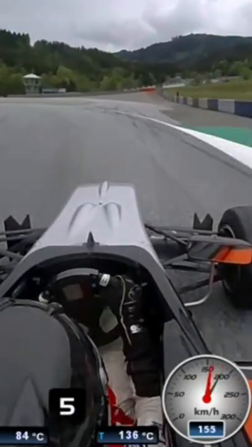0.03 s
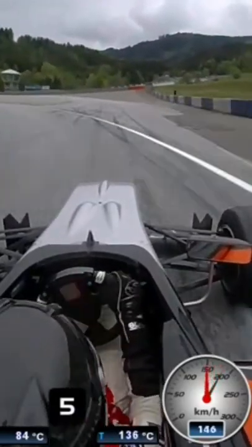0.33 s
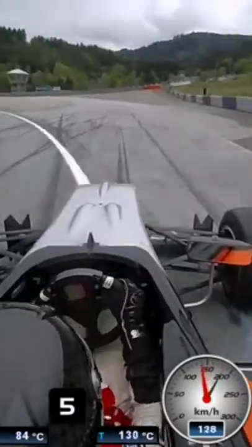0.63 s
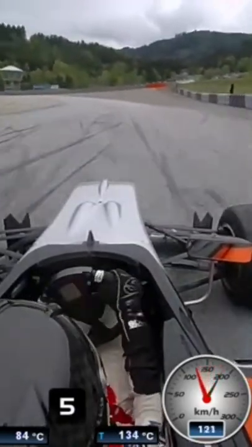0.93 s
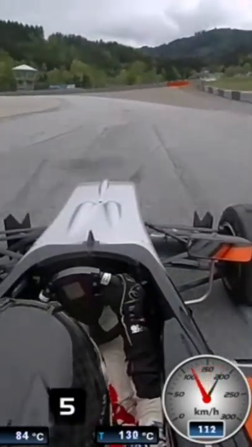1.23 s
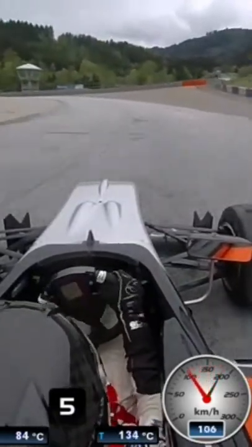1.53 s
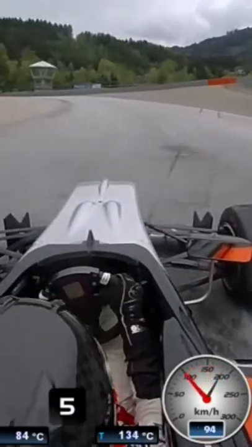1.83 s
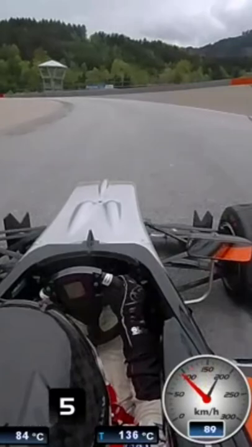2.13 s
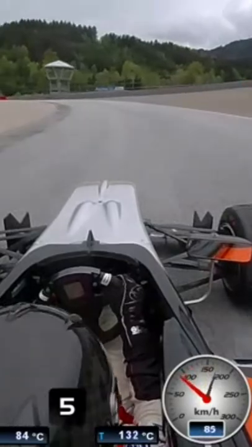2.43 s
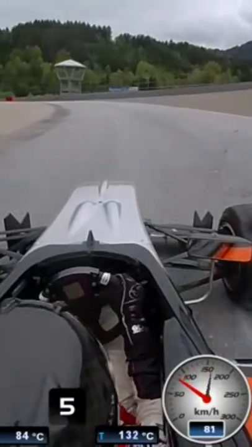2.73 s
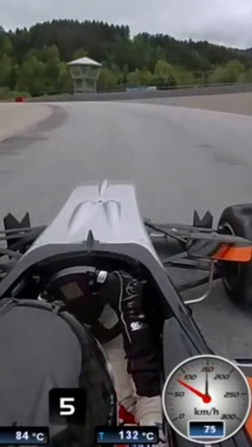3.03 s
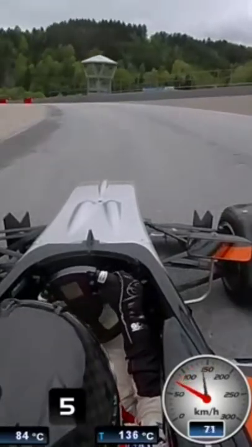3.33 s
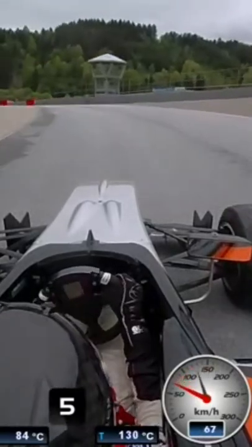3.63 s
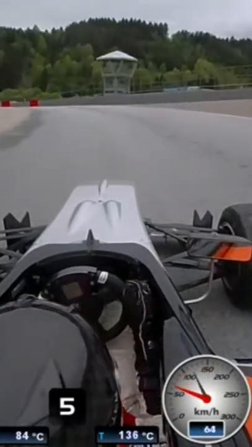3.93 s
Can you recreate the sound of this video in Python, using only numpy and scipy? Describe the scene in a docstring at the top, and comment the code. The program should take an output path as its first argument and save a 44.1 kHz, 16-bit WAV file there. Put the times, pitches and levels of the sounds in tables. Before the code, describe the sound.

Heard from behind the driver, a slowing race car engine blips once and drops to a low, popping burble over wind and tyre noise. Faint friction squeals come and go, loud knocks briefly ring the chassis, and light tapping follows.

```python
"""Open-wheel race car slowing, on board

The engine flares once with a bark, then burbles and pops on a trailing throttle. Its valve gear
rattles and, late on, a loose part taps. Wind and tyres rush, a short volley of knocks rings the
chassis, bumps boom in the bodywork, grit ticks on it and brakes or tyres squeal faintly.
The loudest moments overload the microphone."""
import sys
import numpy as np
from scipy import signal
from scipy.fft import rfft, irfft, next_fast_len
from scipy.io import wavfile
from scipy.ndimage import uniform_filter1d, map_coordinates

SR = 44100
rng = np.random.default_rng(int(sys.argv[2]) if len(sys.argv) > 2 else 0)


def transcribe(u):
    """Save the signal u as a 16-bit wav file named by the first command-line argument.

    u: samples, shape (n,) or (channels, n), limited to [-1, 1]; the rate is SR.
    q: integer samples, one column per channel.
    """
    v = np.clip(np.atleast_2d(u).T, -1, 1)
    q = np.round(v * 32767).astype(np.int16)
    wavfile.write(sys.argv[1], SR, q)


N = 176400
TIME_S = np.arange(N) / SR


def amp(db):
    """Decibels to gain."""
    return 10 ** (np.asarray(db) / 20)


def unit(x):
    """Scale to rms 1."""
    return x / np.sqrt(np.mean(x ** 2) + 1e-20)


def curves(rows):
    """Each column after the time, interpolated per sample."""
    times_s, *columns = np.transpose(rows)
    return [np.interp(TIME_S, times_s, column) for column in columns]


def wobble(rate_hz):
    """Smooth random curve through Gaussian knots."""
    knots = rng.standard_normal(int(N * rate_hz / SR) + 4)
    return map_coordinates(knots, [TIME_S * rate_hz])


def filtered(x, response):
    """Apply a complex frequency response."""
    size = next_fast_len(N + SR // 2)
    return irfft(rfft(x, size) * response(np.fft.rfftfreq(size, 1 / SR)), size)[:N]


def coloured(x, spectrum):
    """Shape x by (f/Hz, level/dB) points, then scale to rms 1."""
    points_hz, db = np.transpose(spectrum)
    return unit(filtered(x, lambda hz: amp(np.interp(np.log(hz + 1), np.log(points_hz), db))))


def turbulence(patch_db=2.5):
    """White noise with patches of random gain in time and frequency."""
    bins = signal.stft(rng.standard_normal(N), nperseg=1024)[2]
    patches = uniform_filter1d(rng.standard_normal(bins.shape), size=6, axis=0)
    patches = uniform_filter1d(patches, size=6, axis=1)
    return signal.istft(bins * amp(patch_db * unit(patches)), nperseg=1024)[1][:N]


def strikes(rows, attack_s):
    """Envelope of fast-rising, decaying blows, summed in power."""
    power = np.zeros(N)
    for start_s, db, t60_s in rows:
        age_s = np.maximum(TIME_S - start_s, 0)
        power += (amp(db - 60 * age_s / t60_s) * (1 - np.exp(-age_s / attack_s))) ** 2
    return np.sqrt(power)


def ring(hits, hz, t60_s):
    """Damped resonance struck by each hit."""
    age_s = TIME_S[:SR // 10]
    swing = amp(-60 * age_s / t60_s) * np.sin(2 * np.pi * hz * age_s)
    low_cut = signal.butter(2, hz / 2, "highpass", fs=SR, output="sos")
    return signal.sosfilt(low_cut, signal.fftconvolve(hits, swing)[:N])


def impulses(cycles):
    """One impulse per completed cycle."""
    return np.diff(np.floor(cycles), append=0) > 0


# t/s, firing f/Hz, fundamental level/dB, second harmonic level/dB
ENGINE_TRACK = [(0, 106.6, -5, -27), (0.05, 103.1, -5.5, -43), (0.09, 79.65, -12.5, -24.5),
                (0.26, 64.4, -16, -34), (0.29, 104.2, -6, -22), (0.365, 92.05, -9, -28),
                (0.405, 130.2, -2, -12), (0.5, 157.3, -4.5, -35), (0.67, 133.2, -5, -16),
                (0.73, 108.1, -7.5, -30), (0.8, 98.2, -8, -25.5), (0.92, 65.03, -20, -23),
                (1.17, 66.33, -15.5, -20), (1.27, 66.55, -17.5, -31), (1.35, 58.24, -21.5, -14),
                (1.76, 60.07, -19.5, -14), (1.86, 55, -21.5, -18), (2.3, 51.53, -21.5, -25),
                (2.55, 62.34, -17.5, -12.5), (2.66, 59.62, -18, -22.5), (2.87, 79.7, -10.5, -31),
                (2.98, 67.93, -15.5, -20.5), (3.1, 58.47, -22, -13), (3.17, 87.02, -7.5, -26.5),
                (3.25, 82.5, -9.5, -30), (3.34, 73.9, -16, -29.5), (3.42, 82.4, -9.5, -38),
                (3.55, 70.4, -14, -27), (3.67, 82.98, -10, -26), (3.76, 77.4, -14, -25.5),
                (4, 72.0, -15, -35)]


def engine(jitter=0.012, rasp_above_hz=120):
    """Exhaust, rattle and a loose part, all driven by one slightly unsteady firing rate."""
    firing_hz, first_db, second_db = curves(ENGINE_TRACK)
    phase = 2 * np.pi * np.cumsum(firing_hz * (1 + jitter * wobble(40))) / SR
    revved = np.clip((firing_hz - rasp_above_hz) / 10, 0, 1)
    exhaust = exhaust_boom(phase, first_db, second_db) + exhaust_pulses(phase, revved)
    return exhaust + engine_rattle(phase, revved) + loose_part(phase)


# harmonic number, level/dB re a blend of the lowest two
UPPER_HARMONICS = [(3, -21), (4, -27.5), (5, -29)]


def exhaust_boom(phase, first_db, second_db, shimmer_db=1.5, upper_swing_db=3):
    """Two strong harmonics of the firing rate and weak upper ones, all a little uneven."""
    first, second = amp(first_db), amp(second_db)
    boom = first * amp(shimmer_db * wobble(35)) * np.sin(phase)
    boom += second * amp(shimmer_db * wobble(35)) * np.sin(2 * phase)
    blend = np.hypot(first, 2 * second)
    for harmonic, db in UPPER_HARMONICS:
        gain = blend * amp(db + upper_swing_db * wobble(25))
        boom += gain * np.sin(harmonic * phase + 0.5 * wobble(30))
    return np.sqrt(2) * boom


# exhaust resonances: f/Hz, level/dB, t60/s
OVERRUN_MODES = [(203, -24.5, 0.069)]
HIGH_REV_MODES = [(460, -31, 0.0078), (700, -25, 0.0076), (2170, -15.5, .009)]


def exhaust_pulses(phase, revved, scatter_db=4, stagger_cycles=0.12):
    """Uneven firings ring the exhaust: a staggering burble on the overrun, a bark at high revs."""
    cycles = phase / (2 * np.pi)
    strength = amp(scatter_db * np.clip(rng.standard_normal(N), -2, 2))
    staggered = strength * impulses(cycles + stagger_cycles * wobble(60))
    on_time = strength * impulses(cycles)
    burble = sum(amp(db) * ring(staggered, hz, t60_s) for hz, db, t60_s in OVERRUN_MODES)
    bark = sum(amp(db) * ring(on_time, hz, t60_s) for hz, db, t60_s in HIGH_REV_MODES)
    return (1 - revved) * burble + revved * bark


# t/s, rattle level/dB, hiss level/dB
RATTLE_LEVELS = [(0, -26.5, -31), (0.24, -31.5, -35.5), (0.38, -24.5, -29.5), (0.46, -22, -20),
                 (0.56, -25.5, -22.5), (0.61, -28, -30), (0.67, -22.5, -21), (0.73, -30.5, -36.5),
                 (1.05, -34, -40), (1.28, -32, -37.5), (1.55, -35, -39.5), (2.3, -37, -39),
                 (2.68, -31, -35.5), (2.9, -29, -35.5), (3.07, -37, -42), (3.15, -30.5, -37), (4, -34, -38)]
# f/Hz, relative level/dB
RATTLE_SPECTRUM = [(1000, -40), (1650, -12), (2050, 1.5), (2400, -6.5), (3600, -8.5), (4300, -13.5),
                   (5200, -15.5), (8000, -43)]
HISS_SPECTRUM = [(2500, -14), (4600, -6.5), (7350, 3), (8300, -4.5), (10000, -13.5), (15500, -47)]


def engine_rattle(phase, revved, pulse_depth=0.17, rasp_depth=0.55, grain_db=1.67, rasp_grain_db=1.8):
    """Engine rattle and hiss pulse with each firing; at high revs the overloaded peaks crackle."""
    rattle_db, hiss_db = curves(RATTLE_LEVELS)
    depth = (1 - revved) * pulse_depth - revved * rasp_depth
    grain = amp((grain_db + rasp_grain_db * revved) * wobble(500))
    gate = np.exp(depth * np.sin(phase)) * grain
    gate /= np.sqrt(uniform_filter1d(gate ** 2, size=4000))  # hold the local rms at 1
    rattle = amp(rattle_db) * coloured(gate * turbulence(), RATTLE_SPECTRUM)
    hiss = amp(hiss_db) * coloured(gate * rng.standard_normal(N), HISS_SPECTRUM)
    return rattle + hiss


# t/s, level/dB
EXHAUST_POPS = [(0.339, -16.5), (0.851, -19.5), (1.167, -17.5), (1.222, -13.5), (1.933, -14.5),
                (1.966, -18.5), (2.515, -15.5), (2.661, -19), (2.731, -21), (2.88, -16.5)]
# f/Hz, relative level/dB
POP_SPECTRUM = [(120, -17), (450, 8.5), (2200, -7.5), (6000, -20), (14000, -63)]


def exhaust_pops(t60_s=0.07):
    """Soft puffs of late-burning fuel."""
    envelope = strikes([(start_s, db, t60_s) for start_s, db in EXHAUST_POPS], attack_s=0.00059)
    return envelope * coloured(rng.standard_normal(N), POP_SPECTRUM)


# t/s, rumble level/dB, rush level/dB
ROAD_LEVELS = [(0, -16, -26), (0.26, -19.5, -28.5), (0.4, -12.5, -25), (0.66, -21.5, -25),
               (0.78, -23.5, -36.5), (1.25, -23, -32.5), (1.65, -25.5, -35.5), (2.35, -22, -34),
               (2.7, -19, -28.5), (3.05, -25, -36.5), (3.2, -25, -27.5), (3.35, -25.5, -38.5),
               (4, -24.5, -36)]
# f/Hz, relative level/dB
BUFFET_SPECTRUM = [(20, 8), (50, 6.5), (130, 15), (300, -65)]
RUMBLE_SPECTRUM = [(100, -54), (170, 2), (280, 1.5), (380, -10), (490, -4), (590, -11.5), (800, -31.5),
                   (1500, -84)]
RUSH_SPECTRUM = [(350, -46), (600, -0.5), (950, -4), (1450, -7.5), (1750, -5), (2400, -11.5), (5000, -66)]


def wind_and_tyres(buffet_db=-25, gust_db=3, swing_db=1.3):
    """Low wind buffeting, tyre rumble and a midrange rush of air."""
    rumble_db, rush_db = curves(ROAD_LEVELS)
    buffet = amp(buffet_db + gust_db * wobble(14)) * coloured(rng.standard_normal(N), BUFFET_SPECTRUM)
    rumble = amp(rumble_db + swing_db * wobble(27)) * coloured(turbulence(), RUMBLE_SPECTRUM)
    rush = amp(rush_db + swing_db * wobble(20)) * coloured(turbulence(), RUSH_SPECTRUM)
    return buffet + rumble + rush


# f/Hz, bandwidth/Hz, relative level/dB
CHASSIS_MODES = [(397, 45, 11), (780.5, 96.5, 2), (1200, 62, -6)]


def chassis_response(hz):
    """Chassis resonances, summed with alternating sign."""
    return sum((-1) ** k * amp(db) * 1j * hz * width_hz / (mode_hz ** 2 - hz ** 2 + 1j * hz * width_hz)
               for k, (mode_hz, width_hz, db) in enumerate(CHASSIS_MODES))


# t/s, level/dB, t60/s
CHASSIS_KNOCKS = [(2.205, -15, 0.11), (2.214, -3.5, 0.076), (2.223, -7.5, 0.059), (2.231, -3, 0.08),
                  (2.2525, 3.5, 0.037)]
# f/Hz, relative level/dB
CRASH_SPECTRUM = [(60, -37), (200, 2.5), (900, 3.5), (2100, 2), (3000, -6.5), (5000, -10.5), (7300, -7.5),
                  (15500, -51)]


def chassis_knocks(ring_db=-5):
    """Rough blows that crash and ring in the chassis."""
    force = strikes(CHASSIS_KNOCKS, attack_s=0.00072)
    scrape = rng.standard_normal(N)
    ringing = filtered(force * scrape, chassis_response) / np.std(filtered(scrape, chassis_response))
    crash = force * coloured(rng.standard_normal(N), CRASH_SPECTRUM)
    return crash + amp(ring_db) * ringing


# centre t/s, f/Hz, level/dB, length/s
BODY_BUMPS = [(0.366, 253, -11.5, 0.035), (0.855, 86.5, -2.5, 0.013), (1.939, 820, -23, 0.013),
              (1.972, 109, -7, 0.01), (1.998, 225, -8.5, 0.01), (2.72, 487, -13, 0.017),
              (2.779, 205.7, -15, 0.04)]


def body_bumps():
    """Bumps boom in the bodywork, each a brief tone under a bell-shaped envelope."""
    booms = np.zeros(N)
    for centre_s, hz, db, length_s in BODY_BUMPS:
        offset_s = TIME_S - centre_s
        envelope = amp(db) * np.exp(-(2 * offset_s / length_s) ** 2)
        booms += envelope * np.sin(2 * np.pi * hz * offset_s)
    return np.sqrt(2) * booms


# t/s, level/dB, t60/s
GRIT_HITS = [(.968, -8, 0.016), (2.5563, -12, 0.02), (2.662, -23, 0.059), (2.702, -23.5, 0.033),
             (2.883, -21, 0.15)]
# f/Hz, relative level/dB
GRIT_SPECTRUM = [(1000, -14.5), (6400, -6), (7200, 2), (8200, -9), (15000, -36.5)]


def grit():
    """Grit strikes the body with short bright ticks."""
    return strikes(GRIT_HITS, attack_s=0.0001) * coloured(rng.standard_normal(N), GRIT_SPECTRUM)


# start t/s, length/s, f/Hz, level/dB, roughness/fraction of f
FRICTION_SQUEALS = [(0.076, 1.02, 1123, -37, 0.041), (1.259, 0.08, 1135, -26.5, .045),
                    (1.374, 0.22, 1160, -34, .055), (2.955, 0.089, 1373, -30, .15)]


def squeals(drift=0.012, swing_db=2, octave_db=-10):
    """Brake or tyre friction: rough, drifting tones with a weak octave."""
    tones = np.zeros(N)
    for start_s, length_s, hz, db, roughness in FRICTION_SQUEALS:
        progress = np.clip((TIME_S - start_s) / length_s, 0, 1)
        pitch_hz = hz * (1 + drift * wobble(16) + roughness * wobble(260))
        phase = 2 * np.pi * np.cumsum(pitch_hz) / SR
        envelope = amp(db + swing_db * wobble(30.12)) * np.sqrt(2 * abs(np.sin(np.pi * progress)))
        tones += envelope * (np.sin(phase) + amp(octave_db) * np.sin(2 * phase))
    return tones


# f/Hz
LOOSE_PART_MODES = [2021.5, 3241, 3680]


def loose_part(phase, start_s=3.12, level_db=-39.5, t60_s=0.028):
    """The engine shakes a metal part; each mode is tapped once every second firing."""
    ringing = np.zeros(N)
    for hz in LOOSE_PART_MODES:
        taps = impulses(phase / (4 * np.pi) + rng.random()) * rng.uniform(0.2, 1, N)
        ringing += ring(taps, hz, t60_s)
    return amp(level_db) * (TIME_S > start_s) * unit(ringing)


def scene():
    """Mono mix, heard from behind the driver."""
    mix = engine() + exhaust_pops() + wind_and_tyres()
    mix += chassis_knocks() + body_bumps() + grit() + squeals()
    return mix[None]


def record(dry):
    """The overloaded microphone flattens peaks at full scale; a band limit cuts the top treble."""
    hardness, top_hz = 20, 15650
    flattened = dry[0] / (1 + abs(dry[0]) ** hardness) ** (1 / hardness)
    return filtered(flattened, lambda hz: hz < top_hz)[None]


dry = scene()
out = record(dry)
transcribe(out)
```